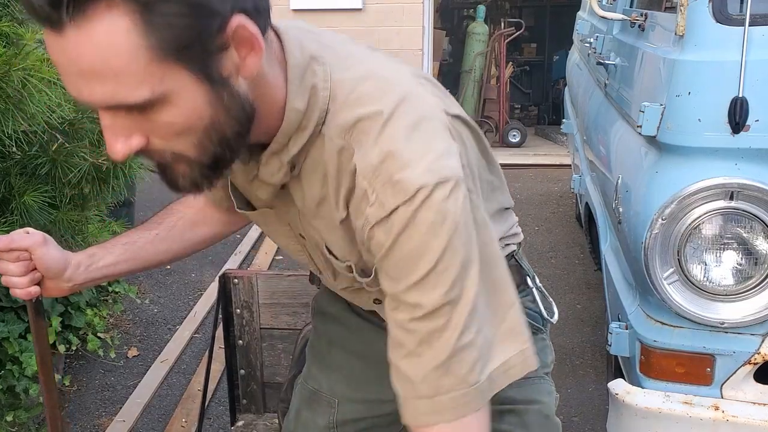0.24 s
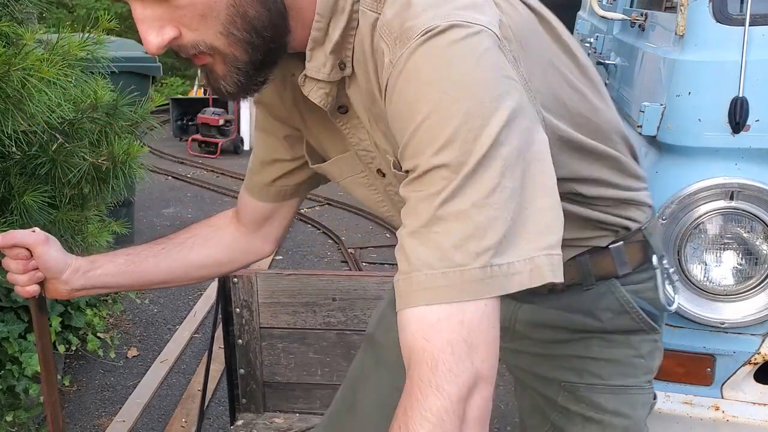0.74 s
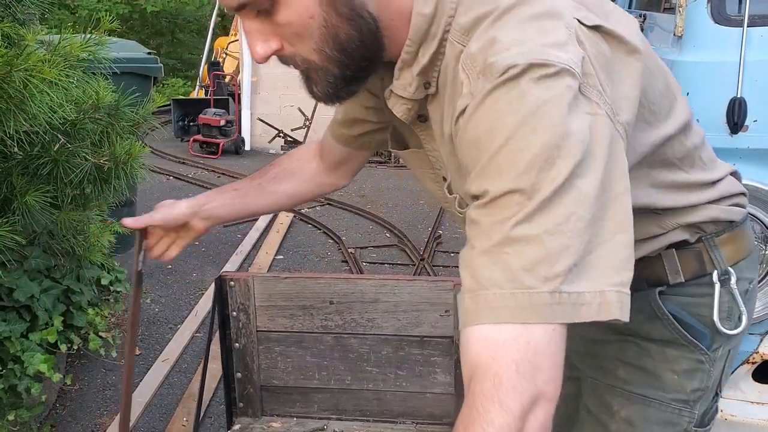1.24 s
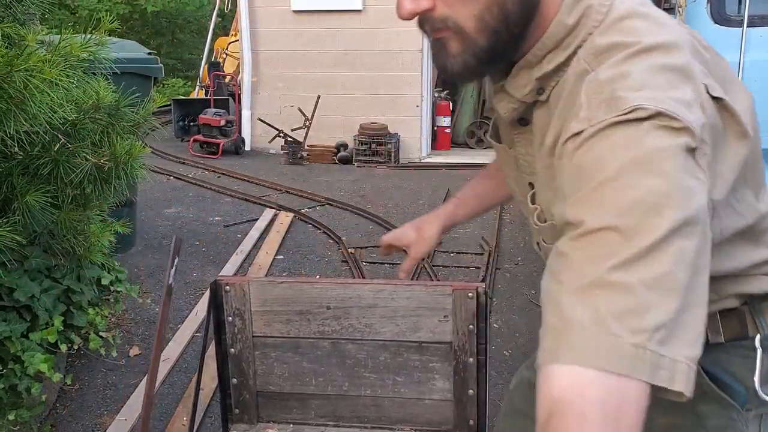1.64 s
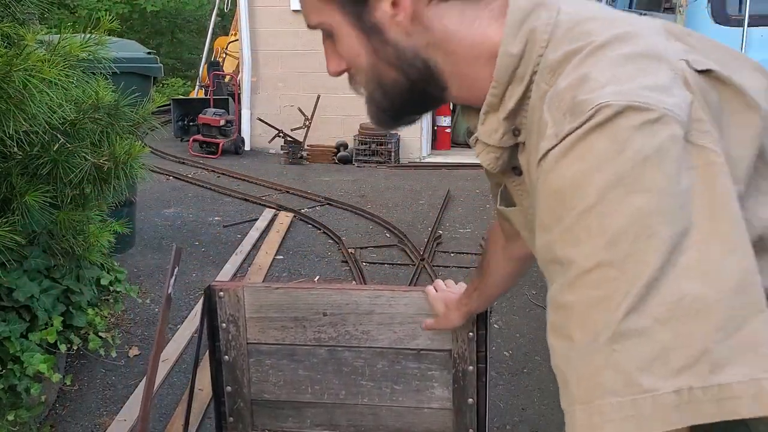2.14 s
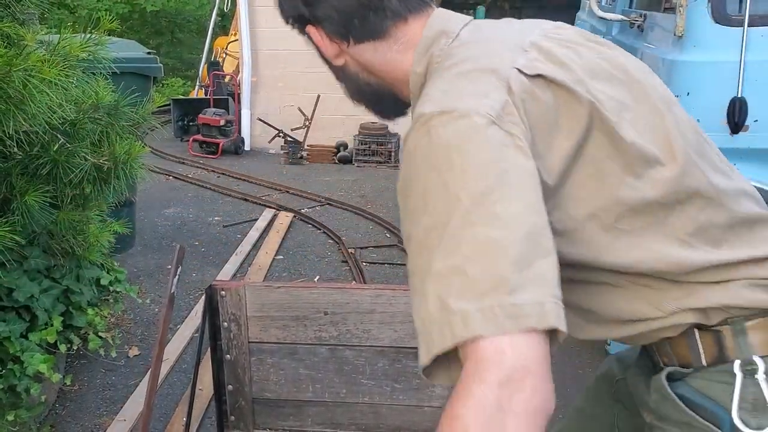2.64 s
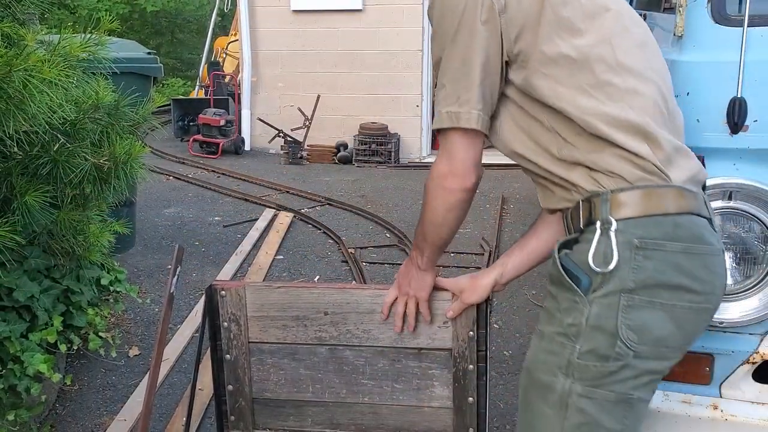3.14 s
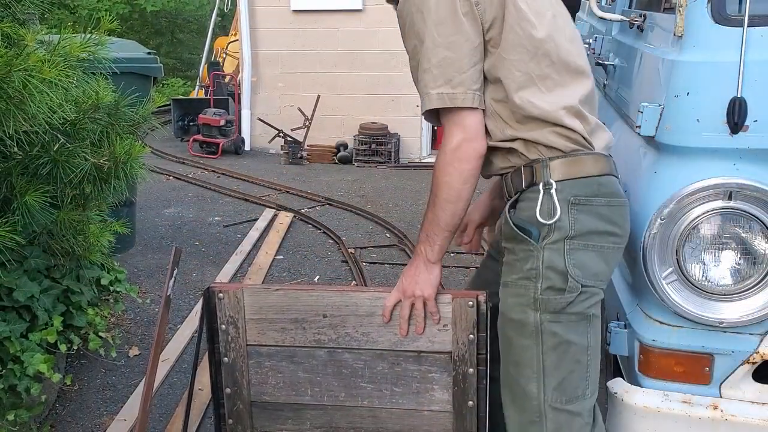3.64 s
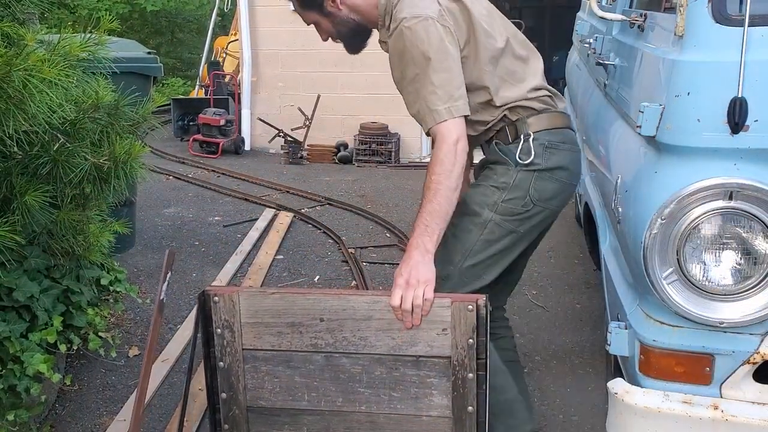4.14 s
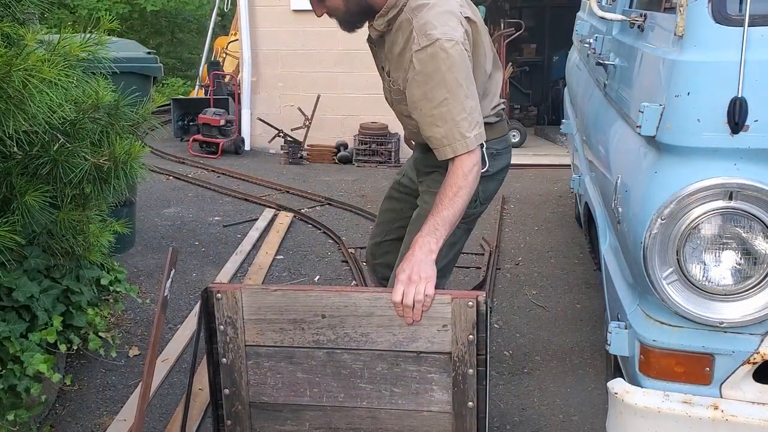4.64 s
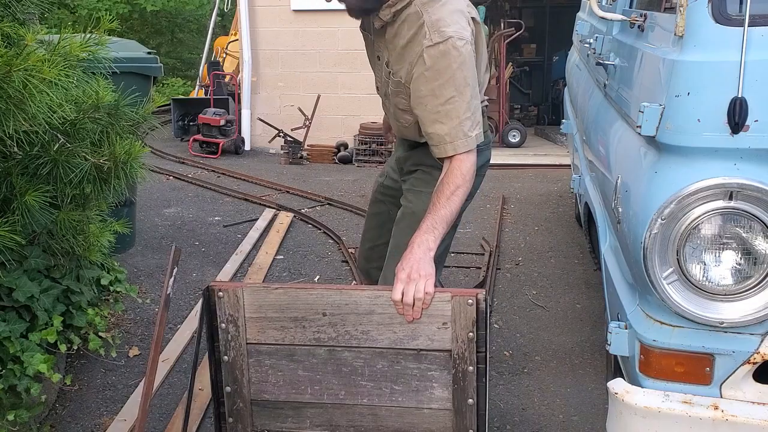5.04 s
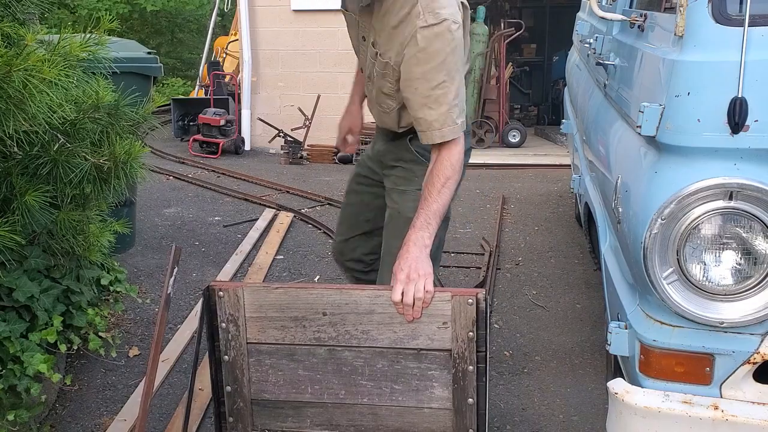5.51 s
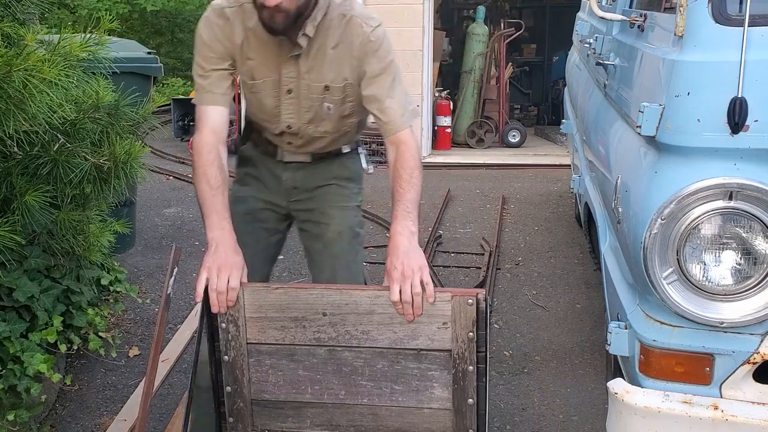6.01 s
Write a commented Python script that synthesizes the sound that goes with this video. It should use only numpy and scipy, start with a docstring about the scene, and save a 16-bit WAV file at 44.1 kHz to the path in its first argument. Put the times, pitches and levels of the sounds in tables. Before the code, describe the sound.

An open yard with short, soft echoes, a faint hiss and deep low rumble. From 0 to 1.2 s, leaves and cloth brush crisply near the left microphone, with a firm wooden knock at 0.6 and sharp ticks around 0.85. Iron squeaks start faintly at 0.9, chirp at 1.03 and cluster from 1.27 to 1.7, with a strong gritty scrape from 1.42 and a ringing metal clank at 1.5. Plank knocks continue to 2.1 over a swelling wheel rumble. Small distant whistles and a dove enter around 2; a songbird's chip and chirping run comes at 3. Knocks at 2.95, 3.3 and 3.86 lead to a loud hollow boom on the right at 4.13, with rattling rebounds until 4.35. A knock at 4.4 and a harsh scrape at 4.85 follow. It then thins to low rolling, faint birds, soft coos and a thin far trill at 5.6, before a double wooden knock at 6.1.

```python
"""The car on a backyard railway rumbles and knocks while leaves and cloth rustle near the left microphone.
From 0.9 s the iron switch squeals, clanks at 1.5 s and scrapes; from 1.9 s songbirds and a dove call.
Something hollow is bumped on the right at 4.1 s; scrapes, knocks and a thin far trill come near the end.
Blows are sums of fading tones, squeals and birds are gliding tones, and scrapes, rumble and rustle
are shaped noise; echoes and left-right balance place them in the yard."""
import sys
import numpy as np
from scipy import signal
from scipy.fft import rfft, irfft, next_fast_len
from scipy.io import wavfile
from scipy.ndimage import map_coordinates

SR = 44100
rng = np.random.default_rng(int(sys.argv[2]) if len(sys.argv) > 2 else 0)


def unload_audio(sound):
    """Save the sound as a 16-bit wav file, at the path given as the first command line argument."""
    columns = np.transpose(np.atleast_2d(sound))
    # keep every value between -1 and 1, then stretch to whole-number steps
    steps = np.round(np.clip(columns, -1, 1) * 32767)
    wavfile.write(sys.argv[1], SR, steps.astype(np.int16))


N = 276507  # length in samples

# All levels are relative: the functions below still trim and mix them.
# "Fall time" is always the time in seconds to fade by 60 dB.

# Iron switch squeals. Each row: start in seconds, length in seconds, start pitch in Hz, end pitch in Hz,
# level in dB, chatter depth as a share of the pitch.
SQUEALS = [(.89, 0.077, 825, 784, -50, 0.12), (1.034, 0.056, 4220, 4086, -38, .002),
           (1.272, 0.085, 2140, 2201, -33.5, 0.0055), (1.315, 0.0906, 1485, 1589, -29.5, 0.017),
           (1.43, 0.051, 2230, 2127, -38.5, 0.02), (1.53, 0.044, 3100, 3490, -38, 0.032),
           (1.615, .1, 1480, 1723, -33, 0.047), (1.625, 0.07, 2820, 2720, -42.5, 0.034)]
# Lever and rod, struck as the switch closes. Each row: pitch in Hz, strength in dB, fall time in seconds.
LEVER_TONES = [(200, 0, 0.38), (267.3, -4.5, 0.32), (834, -14.5, 0.21), (1270, -24, 0.19),
               (2050, -29, 0.13), (3270, -13, 0.155), (3330, -26, 0.12)]

# Scraping strokes of iron and shoes. Each row: start in seconds, peak level in dB, first bite level in dB,
# time to the peak in seconds, fall time in seconds, low body in dB relative to the grains.
SCRAPES = [(1.268, -37, -44.5, 0.057, 0.38, -17), (1.422, -25, -31.5, 0.088, 0.069, -7.5),
           (1.617, -40.5, -41, 0.062, 0.1, -3.5), (1.85, -51, -52.5, 0.017, 0.52, 3.5),
           (2.552, -52, -64, 0.18, 0.22, 3.5), (3.815, -35.5, -49.5, 0.053, 0.34, 2),
           (4.425, -66, -60, 0.0067, 0.7, 8.5), (4.838, -24, -31.5, 0.062, .25, -8),
           (6.088, -56.5, -69, 0.082, 0.2, 6.5)]
# Tone of the scraped grains, then of the duller body. Each row: frequency in Hz, level in dB.
GRAIN_TONE = [(200, -36), (700, -10), (1100, -3), (1400, -2), (1800, 2.5), (2300, 3.5), (3300, -1.5),
              (4500, -7.5), (6200, -12), (7500, -21), (16000, -24.5)]
SCUFF_TONE = [(35, -20), (80, -1.5), (300, 1.5), (600, -3.5), (900, -6), (2000, -13.5), (6000, -66.5)]
DRAG_SHARE = 0.57  # part of the time to the peak in which the weight comes on
BITE_RISE_S, BITE_T60_S = 0.007, 0.39  # first contact of a stroke
BITE_BODY_DB = 5  # the first contact is heavier in the lows than the drag
GRAZE_DB = -28.5  # hiss of a bump's contact, relative to its rattle

# Knocks on the car and footfalls. Each row: start in seconds, plank level in dB, thud level in dB,
# clack level in dB, delay of the rebound in seconds (0 for none).
KNOCKS = [(.048, -43, -46, -45, 0.0031), (.601, -23.5, -44, -26, 0.0016), (.673, -27.5, -40.5, -38, 0.025),
          (.873, -34.5, -44.5, -42.5, 0.0013), (1.035, -37, -68, -34, 0.011),
          (1.144, -45.5, -59, -42, 0.0053), (1.502, -25, -37.5, -29.5, .033), (1.604, -30, -59, -42, 0),
          (1.797, -27.5, -37, -36, 0.05), (1.918, -36.5, -47, -40, 0.0015),
          (2.114, -35, -48, -50.5, 0.00059), (2.952, -33, -40, -39, .015), (3.277, -33.5, -63, -70, 0.0026),
          (3.411, -36, -50.5, -40.5, 0.0067), (3.856, -29.5, -36.5, -43, 0.034),
          (4.065, -35, -55, -40, 0.00075), (4.425, -27, -41, -38.5, 0), (6.106, -30.5, -37.5, -52, .045)]
# The car's plank body. Each row: pitch in Hz, strength in dB, fall time in seconds.
PLANK_TONES = [(120.3, -5.5, 0.14), (158.7, 0.5, 0.12), (201.6, -5.5, 0.24), (242.8, -0.5, 0.083),
               (292, -7.5, .14), (365.6, -6, 0.079), (449.7, -8.5, 0.1), (564, -13, 0.058)]
# Tone of the clack at the contact. Each row: frequency in Hz, level in dB.
CLACK_TONE = [(150, -35), (450, 10), (1050, 7.5), (1500, 3.5), (2800, -3.5), (6000, -18.5), (16000, -68.5)]
REBOUND_DB, REBOUND_CLACK_DB = -2.5, -2.5  # the second, duller contact as the load settles

# Bumps on a hollow panel. Each row: start in seconds, boom level in dB, rattle level in dB.
BUMPS = [(4.133, -6, -18), (4.177, -26, -33), (4.229, -13, -26), (4.256, -25, -35), (4.291, -21, -31),
         (4.319, -18, -28.5), (4.339, -22, -40)]
# The panel, then the frame that holds it. Each row: pitch in Hz, strength in dB, fall time in seconds.
PANEL_TONES = [(174.2, -19, 0.32), (211, -29, 0.67), (266, -1, 0.07), (326.3, 11, 0.046),
               (366.5, -4, 0.044), (428, -16.5, .05)]
FRAME_TONES = [(66.2, -1, .9), (86, -1, 0.86), (110.8, 3.5, 0.51)]
FRAME_DB = -20  # relative to the boom
# Tone of the rattle. Each row: frequency in Hz, level in dB.
RATTLE_TONE = [(200, -18), (430, 2), (600, -6), (740, -1), (850, -3), (1000, -15), (1250, -15), (1800, -29),
               (3000, -40), (5000, -54), (12000, -80)]

# How strongly the moving car rumbles. Each row: time in seconds, level in dB.
CAR_MOTION = [(0.0, -48), (0.31, -69), (0.63, -62), (0.73, -54.5), (1.68, -48), (1.97, -48.5), (2.46, -62),
              (3.32, -56.5), (3.65, -68.5), (3.87, -64), (4.0, -53), (4.3, -51), (4.63, -66), (4.87, -75.5),
              (5.01, -52), (5.34, -72.5), (6.01, -74.5), (6.27, -58)]
# Tone of the rumble, then of the grit under the wheels. Each row: frequency in Hz, level in dB.
RUMBLE_TONE = [(60, -28), (120, 4.5), (190, 1), (280, -1.5), (400, -13.5), (700, -19), (1500, -38.5),
               (4000, -93)]
GRIT_TONE = [(200, -42), (600, 15), (1200, 11.5), (2500, 8.5), (4500, -19.5), (7000, -35), (16000, -30.5)]
ROLL_REF_DB, ROLL_DB = -60, 1.5  # motion counted as zero; rumble trim
GRIT_DB, GRIT_GROWS = -9, 0.77  # grit at zero motion; dB of grit per dB of motion
# Tone of the deep outdoor rumble. Each row: frequency in Hz, level in dB.
GROUND_TONE = [(20, -21), (45, -1.5), (70, -0.5), (105, -0.5), (160, -22.5), (400, -30.5), (1000, -88)]
GROUND_DB, GROUND_GROWS = -54, 0.36  # level at zero motion; dB of ground per dB of motion

# Continuous rustle close by, rising and falling. Each row: time in seconds, level in dB.
NEAR_RUSTLE = [(0, -54.5), (.16, -66.5), (.4, -58), (.65, -60.5), (1.13, -61.5), (1.45, -66.5),
               (1.7, -72.5), (2.1, -76.5), (2.45, -86.5), (2.72, -65.5), (2.9, -73), (3.34, -77),
               (3.5, -69.5), (3.7, -83), (4.2, -75), (4.65, -108), (5.95, -93), (6.18, -67)]
# Brushes of leaves and cloth, and at 4.84 s the close part of a shoe scuff. Each row: start in seconds, # level
# in dB, rise in seconds, fall time in seconds.
BRUSHES = [(.018, -54, 0.0037, 0.14), (.266, -39, 0.019, 0.085), (.328, -41, 0.0041, 0.12),
           (.835, -32.5, 0.03, 0.041), (1.148, -40, 0.0024, .11), (2.55, -65.5, 0.09, 0.41),
           (3.83, -54.5, 0.016, 0.16), (4.055, -50.5, 0.0097, 0.078), (4.84, -35, 0.028, 0.11)]
# The sharpest ticks. Each row: start in seconds, level in dB.
TICKS = [(.2816, -23), (.601, -24), (.769, -31), (.854, -16.5), (.874, -14.5), (1.035, -27), (1.409, -27.5),
         (2.152, -33), (2.222, -38), (3.411, -30), (4.178, -37)]
# Tone of leaves and cloth. Each row: frequency in Hz, level in dB.
RUSTLE_TONE = [(300, -34), (1500, -10.5), (4000, -0.5), (7500, -4.5), (11500, 0.5), (13500, -2.5),
               (16000, -1.5)]
SMALL_TICKS_PER_S, SMALL_TICK_DB = 4, 18  # stray ticks; their lowest level above the rustle

# A songbird's phrases, a high chip and then a run of chirps. Each row: start in seconds, level in dB.
PHRASES = [(2.977, -44.5), (4.459, -50.5)]
CHIP_S, CHIP_HZ, CHIP_DB = 0.028, 3800, -1.5
RUN_AFTER_S, RUN_STEP_S, RUN_LOW_HZ, RUN_TOP_HZ = 0.05, 0.039, 2240, 2800
RUN_ARCH = 0.66  # the run follows this share of a half sine: it climbs, tops out and droops
RUN_ENDS_DB = -5  # the run is softer at its ends
CHIRP_S, CHIRP_RISE, CHIRP_TRILL = 0.0525, 0.044, 0.047  # rise each side of the middle; shares of pitch
# Falling whistles. Each row: start in seconds, length in seconds, start pitch in Hz, level in dB.
WHISTLES = [(1.92, 0.036, 2933, -42), (1.992, 0.022, 3430, -48.5), (2.014, 0.057, 3180, -41),
            (2.08, 0.064, 2666, -49), (2.128, 0.047, 2225, -49), (2.178, 0.082, 3130, -43.5),
            (2.51, .07, 2320, -54), (2.627, 0.056, 2385, -50), (2.82, .08, 2873, -55),
            (3.468, 0.091, 2736, -50.5), (3.92, 0.035, 2739, -41.5), (4.012, 0.066, 2710, -50.5),
            (4.508, 0.082, 2810, -54.5), (5.079, 0.032, 3210, -50.5), (5.236, 0.05, 3393, -48.5),
            (5.401, 0.16, 3390, -61.5), (5.668, 0.057, 3320, -61.5), (5.846, 0.047, 2342, -56.5),
            (5.889, 0.09, 2926, -59.5)]
FALL_PER_S, WHISTLE_TRILL = 1.063, 0.011  # shares of the pitch
CHORUS_PER_S, CHORUS_HZ, CHORUS_SPREAD, CHORUS_DB, CHORUS_NOTE_S = 14, 3050, 0.15, -67, 0.06
# One far, thin trill. Each row: start in seconds, length in seconds, start pitch in Hz, end pitch in Hz,
# level in dB, trill depth as a share of the pitch.
FAR_TRILL = [(5.56, .45, 5260, 5000, -75, 0.064)]
# The dove's upward and downward opening slurs. Each row: start in seconds, length in seconds,
# start pitch in Hz, end pitch in Hz, level in dB.
DOVE_OPENING = [(2.08, 0.124, 476, 574, -54), (2.25, .33, 694, 492, -65.5)]
# The dove's sagging coos. Each row: start in seconds, length in seconds, start pitch in Hz, level in dB.
COOS = [(2.96, 0.44, 513.3, -55), (4.35, 0.24, 497.3, -55.5), (5.3, .44, 501.4, -64.5)]
COO_SAG_HZ_PER_S = 17.7

# Tone of the faint steady hiss. Each row: frequency in Hz, level in dB.
AIR_TONE = [(120, -39.5), (200, -3), (387, -2.5), (491, 0), (1040, -12), (1120, -38), (1870, -22),
            (3020, -7.5), (3690, -15), (4950, -14), (7270, -28.5), (11900, -27.5), (16000, -31.5)]
# Balance of the yard, the close rustle and the panel. Each row: frequency in Hz, left minus right in dB.
BALANCE_YARD = [(100, 0), (300, 0), (650, 7), (2500, 7.5), (4500, 13.5), (7000, 21), (16000, 21)]
BALANCE_NEAR = [(1000, 12), (4000, 13), (8000, 31), (16000, 23)]
BALANCE_PANEL = [(100, -13.5), (200, -10), (350, -15), (600, -11.5), (900, -6.5), (1500, -8), (5000, 7)]
# How alike noise is at left and right. Each row: frequency in Hz, likeness (1 is identical).
ALIKE = [(40, 0.97), (200, 0.94), (800, 0.25), (2500, 0.53), (10000, 0.42)]
# How long the yard rings. Each row: frequency in Hz, fall time in seconds.
YARD_FALL = [(100, .5), (500, .42), (3000, .46), (6000, .34), (10000, .2), (14000, .15)]
TOP_HZ = 16000  # nothing is kept from here up


def switch():
    """The iron points squeal as they slide and close with a clank of lever and rod."""
    iron = glides(SQUEALS, waver=0.004, trill_hz=130, flutter_db=1.8, overtone_db=-15, edge=0.29)
    add(iron, 1.502, amp(-19) * ring(LEVER_TONES, attack=0.0052, scatter_db=-0.5))
    return iron


def scrapes():
    """Grit crushed under iron or a sole: each stroke bites, then drags; dense grains over a duller body."""
    rows = []
    for s, peak_db, bite_db, peak_s, t60, body_db in SCRAPES:
        rows.append((s, bite_db, BITE_RISE_S, BITE_T60_S, body_db + BITE_BODY_DB))
        rows.append((s + peak_s * (1 - DRAG_SHARE), peak_db, peak_s * DRAG_SHARE, t60, body_db))
    # the panel bumps graze a little too
    rows += [(s, rattle_db + GRAZE_DB, 0.0025, 0.08, -5.5) for s, _, rattle_db in BUMPS]
    grains = strokes([row[:4] for row in rows]) * noise(GRAIN_TONE, grain_db=1)
    body_rows = [(s, db + body_db - 2, rise, t60) for s, db, rise, t60, body_db in rows]
    body = strokes(body_rows) * noise(SCUFF_TONE)
    return (grains + body) * amp(1.55 * wobble(120))


def knocks():
    """Each blow rings the planks, thuds through the frame and clacks at the contact; some land twice."""
    blows = []
    for s, plank_db, thud_db, clack_db, after in KNOCKS:
        blows.append((s, plank_db, thud_db, clack_db))
        if after > 0:
            blows.append((s + after, plank_db + REBOUND_DB, thud_db, clack_db + REBOUND_CLACK_DB))
    thud_tones = [(56, 9.5, 0.034), (80.5, -2.0, 0.096), (99.6, -3.5, 0.093)]  # Hz, dB, fall time s
    body = np.zeros(N)
    for s, plank_db, thud_db, _ in blows:
        add(body, s, amp(plank_db + 0.5) * ring(PLANK_TONES, attack=0.0035, scatter_db=5.5))
        add(body, s, amp(thud_db + 6) * ring(thud_tones, attack=0.013, scatter_db=4.0))
    clack = strokes([(s, clack_db - 4.5, 0.002, 0.07) for s, _, _, clack_db in blows])
    return body + clack * noise(CLACK_TONE, grain_db=-2)


def rolling_car(motion_db):
    """Wheels creep on gritty rail: rumble and grit both grow with the car's motion."""
    rumble = amp(ROLL_DB + motion_db + 1.96 * wobble(30)) * noise(RUMBLE_TONE)
    grit_level = amp(GRIT_DB + GRIT_GROWS * motion_db + 1.5 * wobble(14))
    grit = grit_level * noise(GRIT_TONE, grain_db=1.5)
    return amp(ROLL_REF_DB) * (rumble + grit)


def bumps():
    """A soft blow and its rebounds rattle the hollow panel, then swell to a boom; its frame rings on."""
    boom = np.zeros(N)
    for s, boom_db, _ in BUMPS:
        add(boom, s, amp(boom_db) * ring(PANEL_TONES, attack=0.011, scatter_db=0.5))
        add(boom, s, amp(boom_db + FRAME_DB) * ring(FRAME_TONES, attack=0.015, scatter_db=1.5))
    rattle = strokes([(s, rattle_db, 0.003, 0.06) for s, _, rattle_db in BUMPS])
    return boom + rattle * noise(RATTLE_TONE, grain_db=1.5)


def leaves_and_cloth():
    """Leaves and cloth brush and tick near the left microphone, and a shoe scuffs close by at 4.84 s; stray
    ticks follow the rustle's level."""
    rustle = amp(curve(NEAR_RUSTLE) - 1.0 + 5.0 * wobble(45))
    brushes = (rustle + strokes(BRUSHES)) * noise(RUSTLE_TONE, grain_db=4)
    ticks = list(TICKS)
    for at, size in rng.random((int(SMALL_TICKS_PER_S * N / SR), 2)):
        rustle_db = 20 * np.log10(rustle[int(at * N)])
        ticks.append((at * N / SR, rustle_db + SMALL_TICK_DB + 9 * size))
    snaps, t = np.zeros(N), np.arange(SR // 200) / SR
    for s, db in ticks:  # a tick is over within a few cycles
        fade = amp(db + 0.5 - 60 * t / 0.00022)
        add(snaps, s, fade * np.cos(2 * np.pi * 10000 * amp(rng.normal()) * t))
    splinters = strokes([(s, db - 19, 0.001, 0.05) for s, db in ticks])
    splinter_tone = [(500, -4.5), (2500, -9.5), (6000, -6), (12000, -1.5), (16000, -5.5)]  # Hz, dB
    return brushes + snaps + splinters * noise(splinter_tone)


def birds():
    """Distant phrases, whistles and coos over a faint chorus, smeared by the yard."""
    notes = [note for s, db in PHRASES for note in phrase(s, db)]
    notes += [whistle(*row) for row in WHISTLES] + list(FAR_TRILL)
    for at, length, pitch, size in rng.random((int(CHORUS_PER_S * N / SR), 4)):
        s = at * (N / SR - CHORUS_NOTE_S)
        hz = CHORUS_HZ * np.exp(CHORUS_SPREAD * (4 * pitch - 2))
        notes.append(whistle(s, CHORUS_NOTE_S * (0.5 + length), hz, CHORUS_DB - 6 * size))
    song = glides(notes, waver=0.007, trill_hz=48, flutter_db=4.5, overtone_db=-34, edge=0.6)
    coos = list(DOVE_OPENING)
    coos += [(s, length, hz, hz - COO_SAG_HZ_PER_S * length, db) for s, length, hz, db in COOS]
    dove_notes = [(*row, 0.003) for row in coos]  # a very shallow trill
    dove = glides(dove_notes, waver=0.01, trill_hz=11, flutter_db=3.0, overtone_db=-46, edge=0.34)
    calls = song + dove
    return amp(-6.5) * calls + amp(-10) * yard(calls)


def phrase(s, db, count=7):
    """A chip, then chirps that climb, top out and droop, and are loudest past the middle."""
    low, high = 1 - CHIRP_RISE, 1 + CHIRP_RISE
    notes = [(s, CHIP_S, CHIP_HZ * low, CHIP_HZ * high, db + CHIP_DB, WHISTLE_TRILL)]
    for k, u in enumerate(np.linspace(0, 1, count)):
        hz = RUN_LOW_HZ + (RUN_TOP_HZ - RUN_LOW_HZ) * np.sin(np.pi * RUN_ARCH * u)
        chirp_db = db + RUN_ENDS_DB * (1 - np.sin(np.pi * u ** 1.9))
        start = s + RUN_AFTER_S + k * RUN_STEP_S
        notes.append((start, CHIRP_S, hz * low, hz * high, chirp_db, CHIRP_TRILL))
    return notes


def whistle(s, length, hz, db):
    """A note that slides down at a steady rate."""
    return s, length, hz, hz * np.exp(-FALL_PER_S * length), db, WHISTLE_TRILL


def ground(motion_db):
    """Deep outdoor rumble that swells a little with the car's motion."""
    return amp(GROUND_DB + GROUND_GROWS * motion_db) * noise(GROUND_TONE)


def faint_hiss():
    """A faint, steady noise, stronger on the left."""
    return amp(-69.5) * noise(AIR_TONE) * amp([[2], [-4]])


def walls(x, db):
    """Ground, van and shed throw a few early copies, different at each microphone."""
    delays = rng.uniform(0.002, 0.02, (2, 6))
    echoes = np.zeros((2, SR // 8))
    for ear in (0, 1):
        echoes[ear, (delays[ear] * SR).astype(int)] = amp(db) * rng.choice([-1, 1], size=6)
    return x + signal.fftconvolve(x, echoes, axes=1)[:, :N]


def yard(x):
    """The diffuse answer of walls and trees: fading noise, different at each microphone."""
    hz, t, z = signal.stft(rng.standard_normal((2, SR)), SR, nperseg=256)
    fade = amp(-60 * t / along(YARD_FALL, hz)[:, None])
    tail = signal.istft(z * fade, SR, nperseg=256)[1]
    tail = np.pad(tail / np.linalg.norm(tail[0]), ((0, 0), (SR // 150, 0)))  # starts a moment late
    return signal.fftconvolve(np.atleast_2d(x), tail, axes=1)[:, :N]


def placed(x, balance, lag_s):
    """Share each frequency between the two microphones; the left one hears it lag_s later."""
    ears = np.array([[-1], [1]])

    def response(hz):
        share = 2 / (1 + amp(ears * along(balance, hz)))
        return share * np.exp(1j * np.pi * ears * hz * lag_s)
    return filtered(x, response)


def noise(spectrum, grain_db=0):
    """Stereo noise with a mid of rms 1; grain_db scatters the sizes of its tiny impacts."""
    a, b = rng.standard_normal((2, N)) * amp(grain_db * wobble(1500))

    def turn(hz):  # the angle that gives the wanted left-right likeness
        return np.arccos(np.clip(along(ALIKE, hz), 0, 1)) / 2
    mid = filtered(a, lambda hz: amp(along(spectrum, hz)) * np.cos(turn(hz)))
    side = filtered(b, lambda hz: amp(along(spectrum, hz)) * np.sin(turn(hz)))
    return np.array([mid + side, mid - side]) / np.std(mid)


def strokes(rows):
    """Loudness curve of strokes (start s, dB, rise s, fall time s) that swell and die away."""
    power, t = np.zeros(N), np.arange(SR) / SR
    for s, db, rise, t60 in rows:
        fall = amp(db - 60 * np.maximum(t - rise, 0) / t60)
        add(power, s, (fall * np.minimum(t / rise, 1)) ** 2)
    return np.sqrt(power)


def ring(modes, attack, scatter_db):
    """One blow makes a body ring at its own pitches; peak 1, strengths and pitches vary each time."""
    t = np.arange(SR) / SR
    x = np.zeros(SR)
    for hz, db, t60 in modes:
        fade = amp(db + scatter_db * rng.normal() - 60 * t / t60)
        x += fade * np.sin(2 * np.pi * hz * amp(0.12 * scatter_db * rng.normal()) * t)
    x = x * (1 - np.exp(-(t / attack) ** 2))
    return x / np.abs(x).max()


def glides(rows, waver, trill_hz, flutter_db, overtone_db, edge):
    """Gliding tones with a weak octave; the pitch wavers and trills unevenly."""
    track, drift, flutter = np.zeros(N), wobble(3 * trill_hz), wobble(2 * trill_hz)
    trill = np.sin(2 * np.pi * np.cumsum(trill_hz * (1 + 0.3 * wobble(60))) / SR)
    for s, length, start_hz, end_hz, db, depth in rows:
        i = np.arange(int(s * SR), min(int((s + length) * SR), N))
        bend = 1 + waver * drift[i] + depth * trill[i]
        phase = 2 * np.pi * np.cumsum(np.linspace(start_hz, end_hz, len(i)) * bend) / SR
        swell = signal.windows.tukey(len(i), edge) * amp(db + flutter_db * flutter[i])
        tone = np.sin(phase) + amp(overtone_db) * np.sin(2 * phase)
        add(track, s, np.sqrt(2) * swell * tone)
    return track


def amp(db):
    """Turn decibels into a plain multiplier."""
    return 10 ** (np.asarray(db) / 20)


def along(points, hz):
    """Read a value off (Hz, value) points, on a log frequency axis."""
    f, v = np.transpose(points)
    return np.interp(np.log(hz + 1), np.log(f + 1), v)


def curve(rows):
    """One value per sample from (s, value) points."""
    return np.interp(np.arange(N) / SR, *np.transpose(rows))


def wobble(rate):
    """A smooth random curve, rate knots a second."""
    knots = rng.standard_normal(int(N * rate / SR) + 4)
    return map_coordinates(knots, [np.arange(N) * rate / SR])


def filtered(x, response):
    """Scale each frequency of x by response(Hz)."""
    m = next_fast_len(N + SR // 4)
    return irfft(rfft(x, m) * response(np.fft.rfftfreq(m, 1 / SR)), m)[..., :N]


def add(track, s, sound):
    """Mix a sound into the track from time s."""
    part = track[max(round(s * SR), 0):][:len(sound)]
    part += sound[:len(part)]


def scene():
    """Place the sources, from the work at the switch to the faint hiss."""
    motion_db = curve(CAR_MOTION) - ROLL_REF_DB
    work = walls(switch() + scrapes() + knocks(), db=-16.0)
    work = work + amp(-14.5) * yard(work)
    across_yard = work + rolling_car(motion_db) + birds() + ground(motion_db)
    out = placed(across_yard, BALANCE_YARD, lag_s=-0.00027)
    panel = bumps()
    panel = placed(panel + amp(-20.5) * yard(panel), BALANCE_PANEL, lag_s=-0.00013)
    out += panel * [[-1], [1]]  # the boom pushes one microphone as it pulls the other
    near = leaves_and_cloth()
    out += placed(near + amp(-13.0) * yard(near), BALANCE_NEAR, lag_s=-0.00026)
    return out + faint_hiss()


def record(dry):
    """Thin the deepest bass, below about 36 Hz, and keep nothing from TOP_HZ up."""
    return filtered(dry, lambda hz: (hz < TOP_HZ) * hz ** 2 / np.hypot(hz ** 2, 36 ** 2))


dry = scene()
out = record(dry)
unload_audio(out)
```